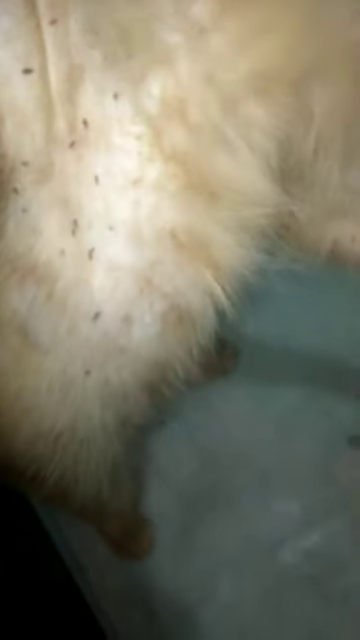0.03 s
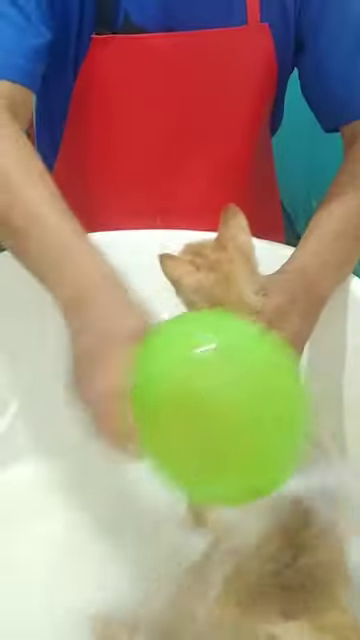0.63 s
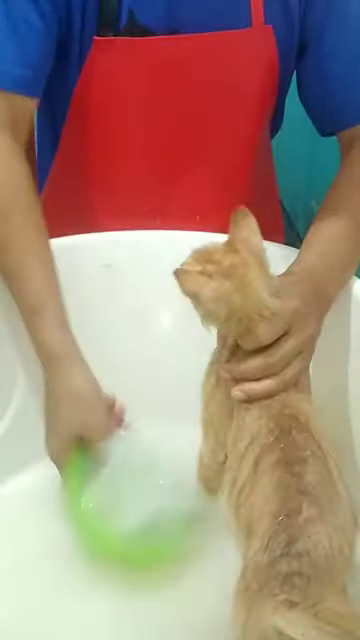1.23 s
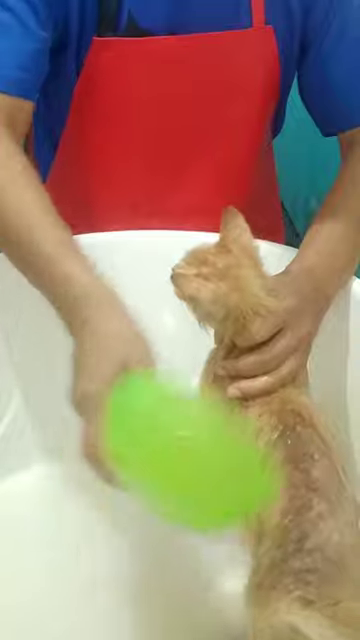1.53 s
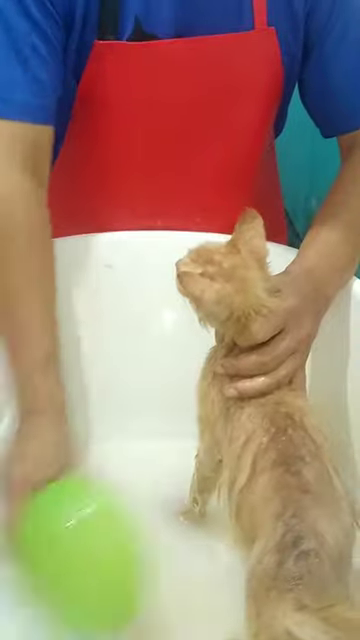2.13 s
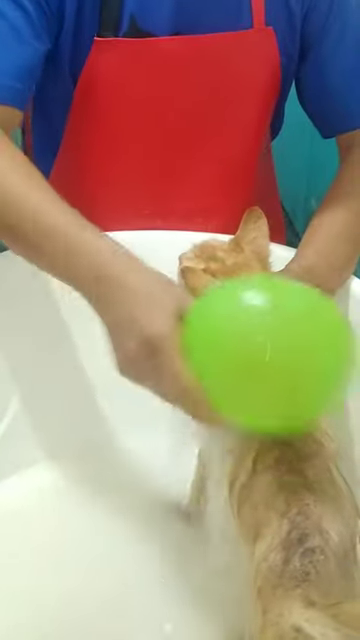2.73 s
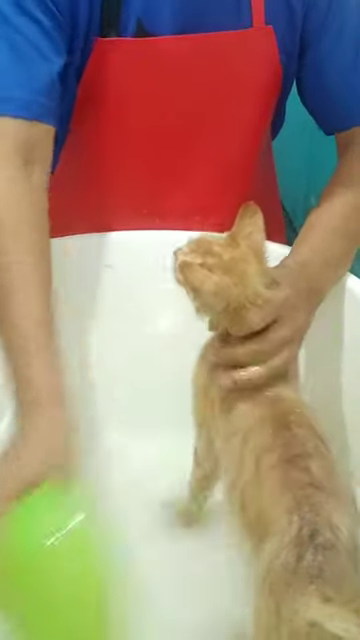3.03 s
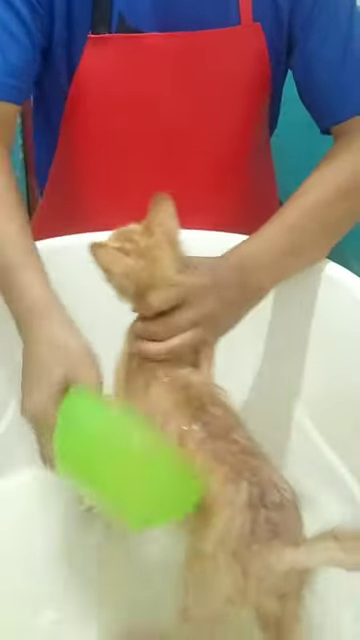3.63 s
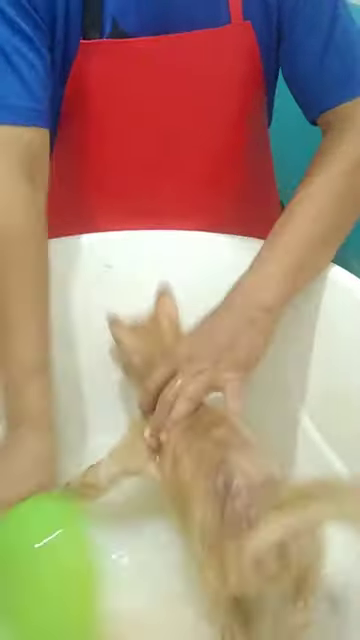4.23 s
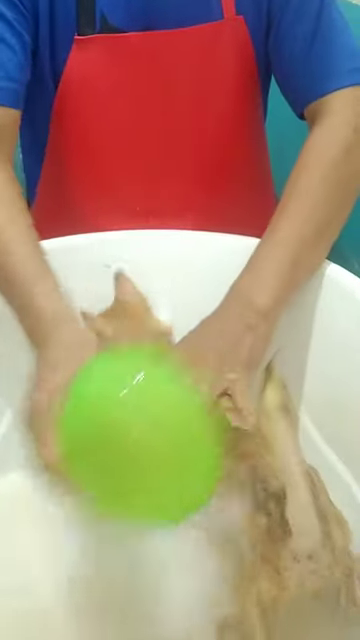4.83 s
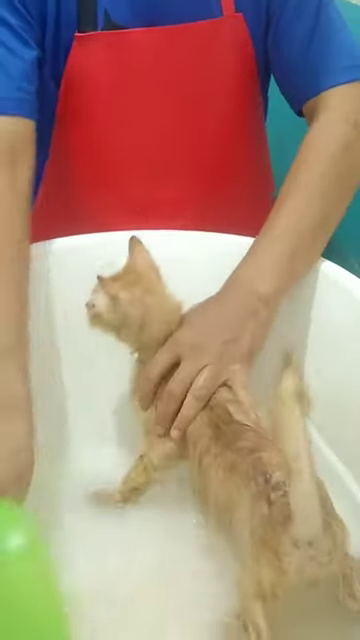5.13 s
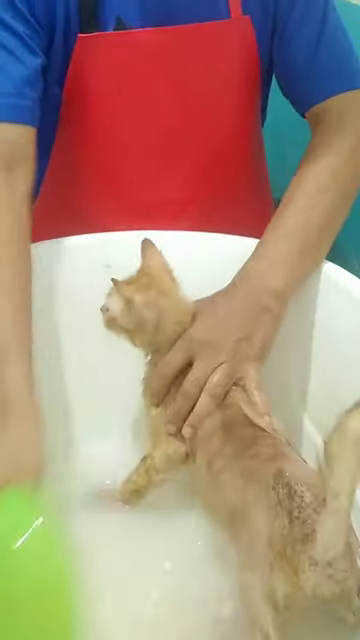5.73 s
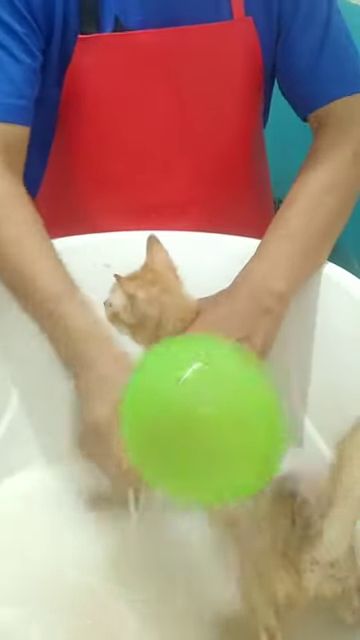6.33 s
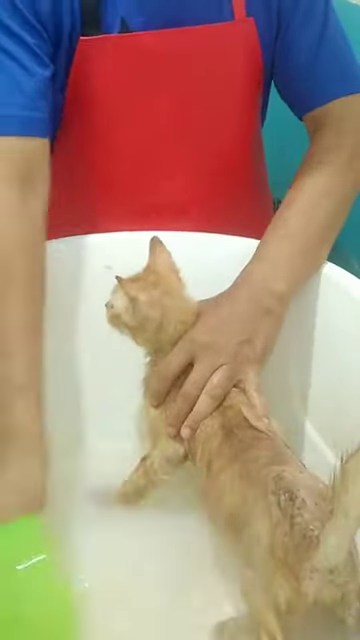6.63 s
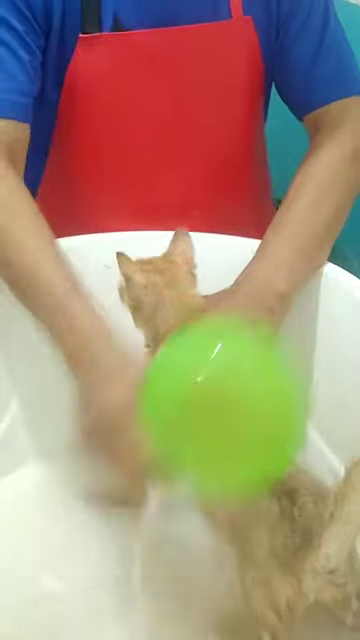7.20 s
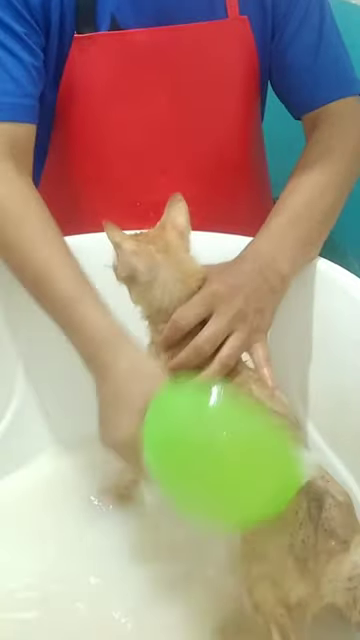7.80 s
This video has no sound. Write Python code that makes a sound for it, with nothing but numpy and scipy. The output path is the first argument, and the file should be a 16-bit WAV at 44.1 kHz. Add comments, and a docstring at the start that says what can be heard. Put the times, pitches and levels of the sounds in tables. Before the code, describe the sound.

After a moment of quiet room air, a soft knock and a short silence, a low engine drone comes through the wall of a small tiled bathroom. Close to the microphone, a plastic bowl plunges into bathtub water eight times, about once a second, each with a hollow plop and a gulp. Between scoops, water is poured over a cat and patters back into the tub with splashes and ringing drips.

```python
"""First comes a moment of a quiet room with one soft knock, then a short silence. An engine outside
starts to drone through the wall of a small tiled room, where a cat is rinsed in a bathtub close to
a microphone with two ports (left and right openings). Eight times a plastic bowl plunges into the
water and gulps full. In between it is emptied over the wet fur, and the water patters back into
the tub, where its bubbles ring like tiny bells."""
import sys
import numpy as np
from scipy import signal
from scipy.fft import rfft, irfft, next_fast_len
from scipy.io import wavfile
from scipy.ndimage import uniform_filter1d

SR = 44100
rng = np.random.default_rng(int(sys.argv[2]) if len(sys.argv) > 2 else 0)


def put_to_file(sound):
    """Save the sound as 16-bit audio at rate SR, in the file named by the first command-line argument."""
    columns = np.atleast_2d(sound).T  # one column per channel
    safe = np.clip(columns, -1, 1)
    whole_steps = np.round(safe * 32767)
    wavfile.write(sys.argv[1], SR, whole_steps.astype(np.int16))


N = 351036
TIME = np.arange(N) / SR

# the rush of air in the quiet opening room: (frequency [Hz], level [dB])
QUIET_AIR = [(18, -49), (30, -32), (48, -7.5), (107, 3), (163, -9), (240, -11), (328, -22), (374, -10),
             (567, -14), (662, -14.5), (794, -17), (1090, -19.5), (1410, -21.5), (1870, -25), (15000, -52)]
# faint tones in that room: (frequency [Hz], level [dB])
QUIET_TONES = [(100, -62), (380, -49), (445, -66), (524, -50.5), (814, -53)]
# the engine idles down, then slowly speeds up: (time [s], speed [cycles/s], level [dB])
ENGINE_RUN = [(.55, 26.8, -39.5), (.85, 22.5, -35), (1.3, 23.8, -36.5), (1.72, 20.2, -34),
              (1.98, 23.2, -31), (2.27, 24.3, -32), (2.7, 29.4, -37), (3.1, 31, -44.5), (3.6, 34.6, -42),
              (4.1, 33, -42), (4.9, 49.4, -41), (5.7, 52, -43), (6.5, 57, -48), (7.95, 57, -42.5)]
# standing waves, the pitches the room boosts: (frequency [Hz], width [Hz], level [dB])
STANDING_WAVES = [(56.6, 1.3, -23), (70, 3.1, -20), (91.5, 9, 1.5), (108, 1.8, 0), (109, 5.1, -2.5),
                  (128.3, 7.1, 7), (167, 5.3, -16), (199, 6, -10), (221.3, 3.6, -2)]
# hum of the mains power: (frequency [Hz], level [dB])
MAINS_HUM = [(100, -42), (200, -59.5)]
# the tone of the room's rumble: (frequency [Hz], level [dB])
RUMBLE_TONE = [(20, -24), (42, -24), (62, -0.5), (100, -7), (135, 0), (170, -12), (220, -15), (280, -12.5),
               (500, -22), (1600, -34.5), (3000, -30.5), (7000, -37), (15000, -44.5)]
# how long the tiles echo: (frequency [Hz], time to fade by 60 dB [s])
TILE_ECHO = [(100, 0.15), (500, 0.15), (1300, 0.23), (3500, 0.28), (9000, 0.43), (15000, 0.077)]
# how alike left and right are for sound from all sides: (frequency [Hz], likeness [-1 to 1])
LIKENESS = [(100, 1), (270, 0.81), (450, 0.99), (740, 0.61), (1220, -0.3), (2000, 0.019), (16000, -0.029)]
# how far the left port is ahead of the right: (frequency [Hz], phase [radians])
LEFT_LEAD = [(0, 0), (860, .8), (1720, 3.8), (2930, 8.0), (4910, 11.5), (10200, 21.3), (16000, 30)]
# how the ports differ in tone: (frequency [Hz], left minus right [dB])
PORT_BALANCE = [(100, -0.9), (330, -2.5), (770, -1.5), (1200, 1.5), (1900, 3.5), (2800, 4), (4200, 0.5),
                (6400, 4.5), (8000, 18), (9800, 6.5), (13000, 2.5)]
# the largest single drips and bubbles: (time [s], level [dB], pitch [Hz], fade time [s])
DRIPS = [(0.8067, -25, 690, 0.011), (.934, -25, 3870, .008), (.992, -24, 5170, .008),
         (1.024, -33, 7300, 0.0051), (1.2767, -11, 770, 0.0078), (1.32, -32, 1630, 0.022),
         (1.386, -6.5, 986, 0.028), (1.668, -34.5, 2710, 0.025), (1.862, -27.5, 4770, 0.013),
         (1.959, -15.5, 4240, 0.0086), (2.274, -8.5, 471, 0.019), (2.419, -13.5, 1080, 0.013),
         (2.542, -28, 2340, 0.019), (2.668, -27, 1870, 0.015), (2.688, -32, 2040, .016),
         (2.72, -29, 5700, 0.0071), (2.748, -42, 4900, .009), (2.875, -38, 5000, 0.011),
         (2.935, -25, 2500, 0.011), (3.01, -26, 8400, 0.0069), (3.022, -18.5, 7760, .007),
         (3.065, -21, 634, 0.015), (3.356, -15, 1059, .025), (3.377, -14.5, 417, 0.042),
         (3.804, -26, 1356, 0.023), (4.07, -24, 630, 0.023), (4.149, -24, 3780, .012),
         (4.185, -15, 466.4, 0.016), (4.186, -19, 2210, 0.012), (4.224, -21, 2300, 0.0091),
         (4.434, -9.5, 614, 0.019), (4.507, -22, 2950, 0.0092), (4.695, -16.5, 3850, 0.017),
         (4.75, -18, 1020, 0.013), (4.992, -18.5, 545, 0.016), (5.096, -10.5, 630, 0.0098),
         (5.314, -13, 1160, 0.028), (5.343, -15.5, 766, 0.037), (5.38, -27, 318, 0.3),
         (5.481, -26.5, 4200, 0.01), (5.605, -26.5, 1560, 0.029), (5.7012, -14, 520, 0.01),
         (5.817, -26, 6040, 0.0075), (5.868, -15, 4800, 0.0042), (5.987, -12, 715, 0.031),
         (6.036, -9.5, 1940, 0.0086), (6.05, -10, 479, 0.017), (6.196, -30.5, 4380, .014),
         (6.282, -22, 450, 0.0061), (6.301, -27, 5910, .008), (6.313, -27, 1690, .014),
         (6.363, -27, 1880, 0.016), (6.461, -23.5, 3300, 0.016), (6.468, -28, 6030, 0.0053),
         (6.564, -29, 6900, 0.008), (6.587, -11.5, 5670, 0.005), (6.7645, -8, 730, 0.016),
         (6.786, -14, 1170, 0.028), (6.833, -15, 467, 0.022), (7.0, -26, 3310, 0.015),
         (7.101, -24.5, 2420, 0.014), (7.145, -28, 4600, 0.012), (7.216, -26, 1240, 0.013),
         (7.361, -20, 1920, 0.02), (7.422, -19, 6300, 0.0057), (7.458, -21.5, 483, 0.03),
         (7.462, -19, 6050, .007), (7.755, -27, 2280, .022), (7.873, -27, 2600, 0.018),
         (7.893, -31, 4800, .009), (7.905, -28.5, 7140, 0.0087)]
# the tone of large, churning bubbles: (frequency [Hz], level [dB])
CHURN_TONE = [(150, -2), (250, -7), (330, 2), (470, 1.5), (750, -3), (1200, -3.5), (1500, -15), (2200, -13)]
# the tone of small, splashing bubbles: (frequency [Hz], level [dB])
SPLASH_TONE = [(1000, 6), (1550, 0), (1950, 1), (2400, -1), (3100, -4.5), (4100, -2), (5600, -27.5),
               (9000, -16)]
# the tone of fine spray: (frequency [Hz], level [dB])
SPRAY_TONE = [(3200, -1), (4800, -1.5), (6000, -6.5), (7400, -4.5), (8400, -16), (9500, -19.5),
              (12000, -16), (13200, -26), (15000, -11.5), (16000, -42)]
# streams that swell, run off the fur and thin out:
# (time of full flow [s], time held [s], churn [dB], splash [dB], spray [dB])
STREAMS = [(.92, 0.11, -39.5, -44.5, -37), (1.375, 0.0064, -43.5, -48, -40.5),
           (2.03, 0.065, -37.5, -41, -30.5), (2.68, 0.012, -50.5, -56, -43),
           (3.011, 0.082, -37, -40, -30.5), (3.6, 0.33, -46, -66, -57), (4.19, 0.086, -39, -39, -32.5),
           (4.48, 0.042, -50, -37.5, -35), (6.28, 0.013, -53, -51, -44.5),
           (6.631, 0.059, -39.5, -46.5, -41.5), (7.41, 0.069, -43, -40, -33)]
# lumps of water that smack the surface and patter on:
# (time [s], smack [dB], smack pitch [Hz], patter time [s], churn [dB], splash [dB], spray [dB])
WATER_LUMPS = [(0.546, -28, 4150, 0.027, -66, -70, -36), (.575, -26, 4600, 0.034, -66, -73, -40),
               (0.808, -40, 4000, 0.019, -60, -65, -37.5), (1.15, -23.5, 7000, .015, -55, -62, -37.5),
               (1.367, -13, 3000, .01, -63, -42, -31), (1.384, -12, 4940, 0.012, -58, -36.5, -31.5),
               (1.67, -46, 3000, 0.27, -75, -78, -47.5), (1.875, -14, 3900, 0.081, -44, -41.5, -33.5),
               (2.418, -13.5, 3900, 0.01, -58, -40, -35), (2.541, -16, 3360, 0.02, -50, -45.5, -50),
               (3.0001, -11, 2588, 0.019, -40, -54, -31), (3.072, -14, 4300, .01, -51, -52, -48),
               (3.2382, -4, 5300, 0.0098, -23, -30, -27), (3.545, -28, 5030, .03, -60, -51, -46),
               (4.133, -19.5, 2890, 0.031, -57, -38, -54), (4.61, -45, 3006, 0.047, -30.5, -40, -63),
               (4.696, -32, 4570, 0.062, -45, -40.5, -37), (4.991, -22, 4310, 0.12, -42.5, -46, -37),
               (5.482, -20.5, 3420, 0.01, -56, -45, -63), (5.686, -22.5, 4460, 0.057, -46.5, -51, -48),
               (5.816, -41, 5810, 0.056, -42.5, -36, -37.5), (6.532, -26, 4600, 0.037, -59, -55, -43),
               (6.587, -37, 5800, 0.051, -55, -47, -31), (6.695, -40, 3000, 0.011, -26.5, -55, -60),
               (7.145, -31, 4750, .01, -48, -71, -69), (7.21, -45, 3970, 0.13, -42, -56, -43.5),
               (7.3229, -23, 5100, 0.037, -55, -53, -39.5), (7.666, -21, 5000, 0.014, -44, -47, -45),
               (7.8, -26, 4040, 0.044, -62, -53, -41), (7.89, -38, 5940, 0.025, -50, -59, -45.5)]
# the air pocket trapped under the bowl: (pitch [Hz], level [dB], fade time [s], rise time [s])
AIR_POCKET = [(295, -6.5, 0.056, 0.015), (489.4, 11.5, 0.029, 0.0054), (760, 10.5, 0.013, 0.0015),
              (1052, 9.5, 0.012, 0.00082)]
# the low notes of the tub: (pitch [Hz], level [dB], fade time [s], rise time [s])
TUB_NOTES = [(102, -2, 0.35, 0.0075), (133.2, 8.5, 0.096, 0.0018), (168, 4, 0.06, 0.0085)]
# the bowl plunges and fills: (time [s], level [dB], pocket pitch [factor],
# pocket brightness [dB/octave], slap offset [dB], boom offset [dB], boom brightness [dB/octave],
# boom head start [s], filling time [s], churn [dB], spray [dB], gulp [dB])
BOWL_SCOOPS = [(1.0911, -9, 1, 2, -6, -5.5, -14, 0.00056, 0.067, -21.5, -40, -44),
               (2.176, -4, 1.06, -0.5, -9, -13, 2, 0.0024, 0.088, -22.5, -41, -31.5),
               (3.246, -7, 1.106, -1.5, -6.5, -7, -8.5, 0.0005, 0.13, -24.5, -35, -41),
               (4.306, -3, 1.05, -4, -10.5, -13.5, -6, 0.0008, 0.11, -25, -33, -30),
               (5.237, -6, 1.067, -5.5, -6, -8.5, -5.5, 0.00093, 0.11, -27, -42.5, -33),
               (5.925, -12, 1.08, 0, -1.5, -3, -17, 0.0109, 0.11, -25, -43, -30.5),
               (6.7101, -8, 1.07, 0, -7.5, -16.5, 8.5, 0.014, 0.1, -26, -41, -27.5),
               (7.544, -6, 1.06, -2.5, -8, -12, 2, 0.0011, 0.11, -25.5, -61, -30)]

BATH_START_S = .545
RUNOFF_DB = (-55, -58, -50)  # the wet fur never stops running: churn, splash, spray
CLOSE_DB = (2.5, .5, -30)  # water closes over the full bowl: the same three, added to the gulp level
CLOSE_RISE_S, CLOSE_FADE_DB_PER_S = 0.053, 171
FILL_RISE_S, FILL_SAG_DB_PER_S, FILL_FADE_DB_PER_S = 0.0045, 45, 117
FILL_SPLASH_DB = -10.5  # added to the churn level
STREAM_RISE_S, STREAM_FADE_DB_PER_S = 0.24, 71
LUMP_RISE_S, LUMP_FADE_DB_PER_S = 0.00098, 175
TRICKLE_DB, TRICKLE_SPREAD_DB = -15, 11  # largest drop before scaling by the flow; range below it
SPURT_DB, SPURT_SPREAD_DB = 11, 9  # largest spurt compared with the stream; range below it
PLIP_DB, FROTH_DB, FOLLOWER_DB = -3, -6.5, -21  # parts of a drip, added to its level
DRIP_GLIDE, FOLLOWER_SPREAD_S = .55, 0.031
GULP_LEAD_S, GULP_S = 0.023, .12  # the gulp peaks just before the bowl is full; its length
GULP_HZ, GULP_OCTAVES, GULP_WIDTH_HZ = 987, 1.1, 260  # middle pitch, climb, width of the ring
RUMBLE_DB, TREBLE_LIMIT_HZ = -43, 15900


def amp(db):
    """Turns decibels into a gain."""
    return 10 ** (np.asarray(db) / 20)


def unit(x):
    """Scales a sound to an average power of 1."""
    return x / np.sqrt(np.mean(x ** 2) + 1e-20)


def read(points, hz):
    """Reads a table between its rows, along a log frequency scale."""
    row_hz, value = np.transpose(points)
    return np.interp(np.log(hz + 1), np.log(row_hz + 1), value)


def add(mix, start_s, sound):
    """Mixes a sound in at the given time."""
    part = mix[max(round(start_s * SR), 0):][:len(sound)]
    part += sound[:len(part)]


def colour(x, points):
    """Shapes the tone of x by rows of (frequency [Hz], level [dB])."""
    size = next_fast_len(x.shape[-1] + 2048)
    gain = amp(read(points, np.fft.rfftfreq(size, 1 / SR)))
    return irfft(rfft(x, size) * gain, size)[..., :x.shape[-1]]


def steadied(x, span_s=0.13):
    """Keeps the fine grain of x but evens out its slow swings."""
    power = abs(uniform_filter1d(x ** 2, int(span_s * SR)))
    return x / np.sqrt(power + 1e-3 * np.mean(x ** 2))


def ring(hz, t60, glide, rise):
    """A tone that fades by 60 dB in t60 seconds while its pitch slides by the share glide."""
    age = np.arange(int(t60 * SR) + 2) / SR
    turns = hz * (age + glide * age ** 2 / (2 * t60))
    return np.sin(2 * np.pi * turns) * np.exp(-np.log(1000) * age / t60) * (1 - np.exp(-age / rise))


def burst(hz, t60, octaves):
    """A dying puff of noise, spread some octaves to each side of hz."""
    age = np.arange(int(t60 * SR) + 64) / SR
    edges_hz = [hz / 2 ** octaves, min(hz * 2 ** octaves, .45 * SR)]
    band = signal.butter(3, edges_hz, "band", fs=SR, output="sos")
    return unit(signal.sosfilt(band, rng.standard_normal(len(age)))) * np.exp(-np.log(1000) * age / t60)


def room_noise(length):
    """Noise from all sides: waves longer than the gap between the ports reach both alike."""
    left, other = rfft(rng.standard_normal((2, length)))
    same = np.clip(read(LIKENESS, np.fft.rfftfreq(length, 1 / SR)), -1, 1)
    right = same * left + np.sqrt(1 - same ** 2) * other
    return irfft(np.array([left, right]), length)


def quiet_room():
    """A dull rush of air with faint tones and one soft knock, cut off after a third of a second."""
    air = amp(-39) * unit(colour(room_noise(N), QUIET_AIR))
    near = sum(amp(db) * np.sin(2 * np.pi * (hz * TIME + rng.random())) for hz, db in QUIET_TONES)
    add(near, .304, amp(-17.5) * ring(430, t60=0.013, glide=0, rise=0.00056))
    add(near, .304, amp(-27) * burst(950, t60=0.012, octaves=1.2))
    return (air + near) * np.interp(TIME, [.327, .337], [1, 0])


def engine():
    """The overtones of a firing engine swell in turn as they slide across the room's standing waves."""
    times, speeds, levels_db = np.transpose(ENGINE_RUN)
    speed = np.interp(TIME, times, speeds)
    turns = np.cumsum(speed) / SR
    grid_hz = np.arange(600.)
    room_power = sum(amp(db) ** 2 / (1 + ((grid_hz - hz) / (width / 2)) ** 2)
                     for hz, width, db in STANDING_WAVES)
    multiples = np.arange(2, 10)[:, None]
    heights = np.interp(multiples * speed, grid_hz, np.sqrt(room_power))
    firing = (heights * np.sin(2 * np.pi * (multiples * turns + rng.random(multiples.shape)))).sum(0)
    return amp(np.interp(TIME, times, levels_db)) * firing / np.sqrt((heights ** 2).sum(0) / 2)


def drone():
    """The engine over mains hum and room rumble; all fade in after the short silence."""
    hum = sum(amp(db) * np.sin(2 * np.pi * hz * TIME) for hz, db in MAINS_HUM)
    rumble = amp(RUMBLE_DB) * unit(colour(room_noise(N), RUMBLE_TONE))
    fade_db = np.interp(TIME, [.405, .42, .5, BATH_START_S], [-81, -34, -21, 0])
    return (engine() + hum + rumble) * amp(fade_db)


def bathroom(x, echo_db, count=5):
    """Direct sound reaches the left port first; the tiles add an echo that changes as the source moves."""
    size = next_fast_len(N + 2048)
    lag = np.interp(np.fft.rfftfreq(size, 1 / SR), *np.transpose(LEFT_LEAD))
    right = irfft(rfft(x, size) * np.exp(-1j * lag), size)[:N]
    out = np.array([x, right])
    for k in range(count):
        hz, age, bands = signal.stft(room_noise(SR // 2), SR, nperseg=256)
        bands *= amp(-60 * age / read(TILE_ECHO, hz)[:, None]) * np.clip(age / 0.0025, 0, 1)
        echo = signal.istft(bands, SR, nperseg=256)[1]
        echo /= np.linalg.norm(echo[0])
        share = np.cos(np.pi * (TIME * 2 + k / count)) * np.sqrt(2 / count)  # the echoes take turns
        out += amp(echo_db) * signal.fftconvolve((x * share)[None], echo, axes=1)[:, :N]
    return out / np.sqrt(1 + amp(echo_db) ** 2)


def trickle(splash):
    """Stray drops run off the wet fur and ring in the tub, a little louder when more water falls."""
    out = np.zeros(N)
    for when, pitch, size in rng.random((260, 3)):
        at = BATH_START_S + when * (N / SR - BATH_START_S)
        hz = 2300 * 3.2 ** pitch
        gain = amp(TRICKLE_DB - TRICKLE_SPREAD_DB * size) * np.interp(at, TIME, splash) ** .28
        add(out, at, gain * ring(hz, t60=60 / hz, glide=.15, rise=1 / hz))
    return out


def drips(followers=3):
    """Each drip throws up froth, a bubble that chirps upward and a few fainter bubbles just after."""
    out = np.zeros(N)
    for at, db, hz, t60 in DRIPS:
        plip = ring(hz, t60, DRIP_GLIDE, rise=.08 * t60)
        add(out, at, amp(db + PLIP_DB) * plip / abs(plip).max())
        add(out, at, amp(db + FROTH_DB) * burst(hz * 1.15, t60 * .8, octaves=.75))
        for late, pitch in rng.random((followers, 2)):
            follower_hz = hz * 2 ** (1.2 * pitch - .3)
            follower = ring(follower_hz, t60 / 2, DRIP_GLIDE, rise=.25 / follower_hz)
            add(out, at + late * FOLLOWER_SPREAD_S, amp(db + FOLLOWER_DB) * follower)
    return out


def surge(peak_s, rise, hold, fade_db_per_s, sag_db_per_s=0):
    """A gain that swells to 1 at peak_s, holds or sags a little, then fades."""
    age = TIME - peak_s
    swell = np.clip(1 + age / rise, 0, 1) ** 2
    return swell * amp(-sag_db_per_s * np.clip(age, 0, hold) - fade_db_per_s * np.maximum(age - hold, 0))


def flow():
    """How hard the water churns, splashes and sprays: scoops, streams and lumps add to the run-off."""
    surges = [(RUNOFF_DB, np.clip((TIME - BATH_START_S) / LUMP_RISE_S, 0, 1))]
    for at, *_, fill_s, churn_db, spray_db, gulp_db in BOWL_SCOOPS:
        filling = surge(at + FILL_RISE_S, FILL_RISE_S, fill_s, FILL_FADE_DB_PER_S, FILL_SAG_DB_PER_S)
        closing = surge(at + fill_s, CLOSE_RISE_S, 0, CLOSE_FADE_DB_PER_S)
        surges.append(((churn_db, churn_db + FILL_SPLASH_DB, spray_db), filling))
        surges.append((np.add(CLOSE_DB, gulp_db), closing))
    for at, hold, *levels_db in STREAMS:
        surges.append((levels_db, surge(at, STREAM_RISE_S, hold, STREAM_FADE_DB_PER_S)))
    for at, _, _, hold, *levels_db in WATER_LUMPS:
        surges.append((levels_db, surge(at + LUMP_RISE_S, LUMP_RISE_S, hold, LUMP_FADE_DB_PER_S)))
    levels_db, gains = zip(*surges)
    return np.sqrt(amp(levels_db).T ** 2 @ np.array(gains) ** 2)  # their powers add up


def spatter(per_s, t60, spread_db):
    """Drops land in clumps: a gain that jumps at each clump and falls back quickly."""
    chance, size = rng.random((2, N))
    clumps = (chance < per_s / SR) * amp(spread_db * np.minimum(-np.log(1 - size), 3))
    fall = np.exp(-np.log(1000) * np.arange(SR // 10) / SR / t60)
    return 1 + signal.oaconvolve(clumps, fall)[:N]


def swarm(per_s, low_hz, high_hz, cycles, spread_db, glide, patchy_db=2, pitches=32):
    """Many bubbles ring at random times, a few of them loudly; each pitch swells and ebbs on its own."""
    out = np.zeros(N)
    steps_s = np.arange(0, 8, .06)
    swells = unit(uniform_filter1d(rng.standard_normal((pitches, len(steps_s))), size=4, axis=0))
    for hz, swell in zip(np.geomspace(low_hz, high_hz, pitches), swells):
        when, size, sign = rng.random((int(per_s * N / SR / pitches) + 1, 3)).T
        level_db = spread_db * np.minimum(-np.log(1 - size), 4)
        level_db += patchy_db * np.interp(when * N / SR, steps_s, swell)
        births = np.zeros(N)
        births[(when * N).astype(int)] = np.sign(sign - .5) * amp(level_db)
        bubble = ring(hz, cycles / hz, glide, rise=0.59 / hz)
        out += unit(signal.oaconvolve(births, bubble)[:N]) * np.sqrt(hz)
    return out


def running_water(churn, splash, spray):
    """Large bubbles churn over a low slosh, small ones splash, and the finest drops fizz."""
    clumps = spatter(per_s=60, t60=.025, spread_db=4.5)
    large = swarm(1000, 200, 1700, cycles=7, spread_db=2.2, glide=.4)
    small = swarm(3000, 1200, 6500, cycles=12, spread_db=3.2, glide=.25, patchy_db=2.5)
    drops = swarm(4000, 3000, 15000, cycles=8, spread_db=4, glide=.05)
    slosh = unit(colour(rng.standard_normal(N), [(40, -44), (100, 4), (170, -15), (300, -29), (700, -74)]))
    churning = amp(2) * steadied(colour(large, CHURN_TONE)) + amp(-4.5) * slosh
    splashing = amp(3) * steadied(colour(small * clumps, SPLASH_TONE))
    fizzing = amp(-2) * steadied(colour(drops * clumps, SPRAY_TONE))
    return churn * churning + splash * splashing + spray * fizzing


def spurts(stream, count=200):
    """The stream breaks into blobs that land as short wet splats, each with a pitch of its own."""
    out = np.zeros(N)
    for when, pitch, size in rng.random((count, 3)):
        hz = 2200 * 3 ** pitch
        splat = burst(hz, t60=70 / hz, octaves=.25)
        add(out, when * N / SR, amp(SPURT_DB - SPURT_SPREAD_DB * size) * splat)
    return out * stream


def smacks():
    """Each lump of water hits the surface with a smack and a bright tick of first contact."""
    out = np.zeros(N)
    for at, db, hz, *_ in WATER_LUMPS:
        add(out, at, amp(db) * burst(hz, t60=.008, octaves=.6))
        add(out, at, amp(db - 8) * burst(7500, t60=.003, octaves=.74))
    return out


def gulps():
    """Water rushes into the bowl; the shrinking hollow rings ever higher."""
    out = np.zeros(N)
    decay = np.exp(-np.pi * GULP_WIDTH_HZ / SR)
    progress = np.linspace(-.5, .5, int(GULP_S * SR))
    sweep = np.exp(2j * np.pi * np.cumsum(GULP_HZ * 2 ** (GULP_OCTAVES * progress)) / SR)
    for at, *_, fill_s, _, _, db in BOWL_SCOOPS:
        noise = rng.standard_normal(len(progress))
        # keep the noise that lies near the climbing pitch
        hollow = signal.lfilter([1], [1, -2 * decay, decay * decay], noise / sweep) * sweep
        gulp = unit(hollow.real * np.cos(np.pi * progress))
        add(out, at + fill_s - GULP_LEAD_S - GULP_S / 2, amp(db) * gulp)
    return out


def plunges():
    """The bowl slaps the water, trapped air rings, and the tub booms deeper or higher by where it lands."""
    out = np.zeros(N)
    for at, db, pitch, pocket_tilt, slap_db, boom_db, boom_tilt, lead_s, *_ in BOWL_SCOOPS:
        add(out, at, amp(db + slap_db) * burst(2400, t60=.03, octaves=1))
        for hz, note_db, t60, rise in AIR_POCKET:
            gain = amp(db + note_db + pocket_tilt * np.log2(hz / AIR_POCKET[1][0]))
            add(out, at, gain * ring(hz * pitch, t60, glide=-0.46, rise=rise))
        for hz, note_db, t60, rise in TUB_NOTES:
            gain = amp(db + boom_db + note_db + boom_tilt * np.log2(hz / TUB_NOTES[0][0]))
            add(out, at - lead_s, gain * ring(hz, t60, glide=0, rise=rise))
    return out


def scene():
    """Mixes everything; the near plunges carry the least echo, the smacks the most."""
    churn, splash, spray = flow()
    scoops = bathroom(plunges(), echo_db=1.5)
    splats = bathroom(smacks() + spurts(np.hypot(splash, spray / 2)), echo_db=5.5)
    plops = bathroom(drips() + trickle(splash), echo_db=2.5)
    water = bathroom(running_water(churn, splash, spray) + gulps(), echo_db=2.5)
    return scoops + splats + plops + water + drone() + quiet_room()


def record(dry):
    """The microphone gives each port its own tone, rounds off high peaks and cuts the top treble."""
    ports = np.array([colour(x, [(hz, side * db / 2) for hz, db in PORT_BALANCE])
                      for x, side in zip(dry, (1, -1))])
    rounded = ports / (1 + (ports / .85) ** 6) ** (1 / 6)
    treble_cut = signal.firwin(511, TREBLE_LIMIT_HZ, window=("kaiser", 9), fs=SR)
    return signal.oaconvolve(rounded, treble_cut[None], "same")


dry = scene()
out = record(dry)
put_to_file(out)
```